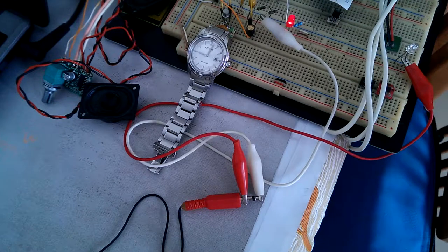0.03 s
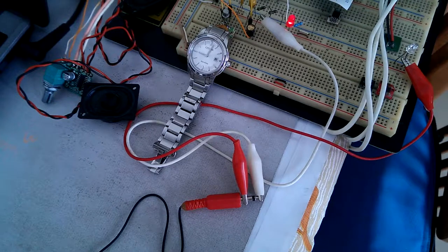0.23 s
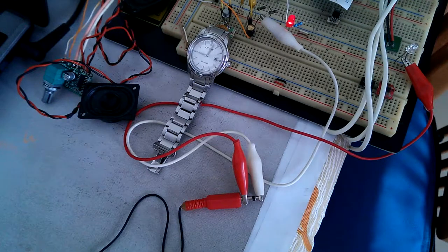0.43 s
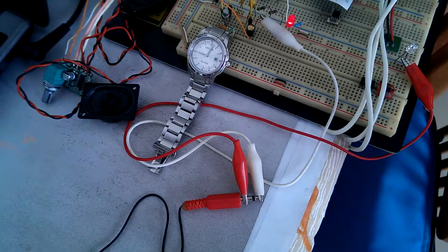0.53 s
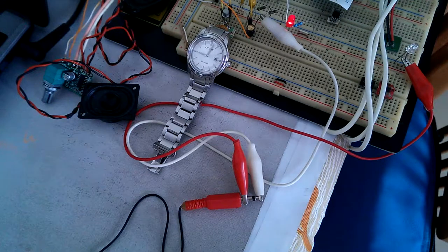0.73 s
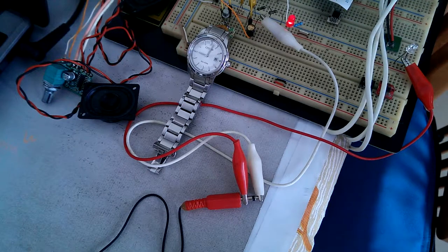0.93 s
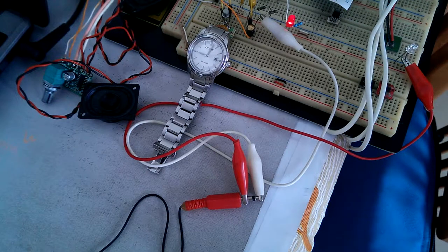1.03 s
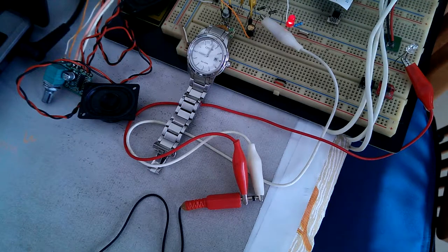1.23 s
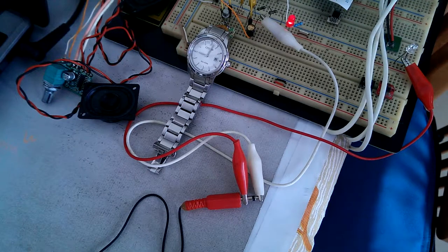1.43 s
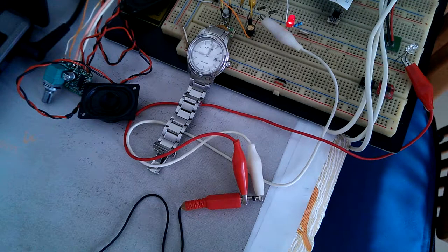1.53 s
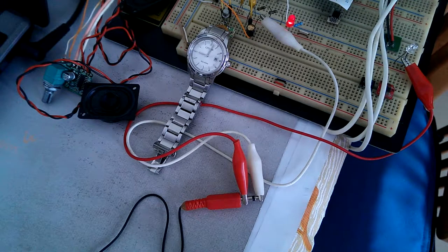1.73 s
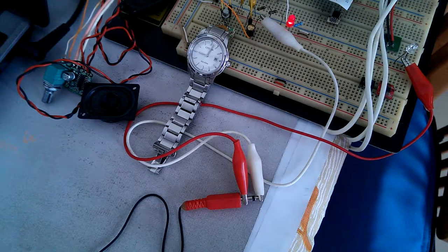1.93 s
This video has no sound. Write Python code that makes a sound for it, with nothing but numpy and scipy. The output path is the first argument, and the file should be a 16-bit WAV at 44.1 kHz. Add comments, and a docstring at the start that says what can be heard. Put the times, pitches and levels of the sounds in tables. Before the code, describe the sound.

Two crisp electronic ticks come from a wristwatch wired to a small amplifier, a second apart and dry, with no room sound. Behind them run a faint hiss and rumble, which fade after a tiny pop at the end.

```python
"""A quartz wristwatch ticking

The watch ticks twice, picked up electrically by a small amplifier. Each tick is a chopped burst of
current that drives its tiny motor, then thin sensing pulses while the rotor (a magnet) swings into
place. Faint hiss and low rumble lie underneath and drop away with a small pop near the end."""
import sys
import numpy as np
from scipy import signal
from scipy.fft import rfft, irfft
from scipy.io import wavfile

SR = 44100
rng = np.random.default_rng(int(sys.argv[2]) if len(sys.argv) > 2 else 0)


def digitize_waveform(pressure):
    """Quantize a signal to 16-bit integers and store it at the path in sys.argv[1].

    Rows of a 2-D input are taken as channels; values are limited to [-1, 1].
    """
    field = np.atleast_2d(pressure).T
    bounded = np.clip(field, -1, 1)
    quanta = np.round(bounded * 32767).astype(np.int16)
    wavfile.write(sys.argv[1], SR, quanta)


N = 88200

CHOP_HZ = 2048  # pulses per second within a burst
SENSE_AFTER_MS = 4.15  # from the start of a tick to its first sensing pulse
OVERSAMPLE = 8  # the thin pulses are drawn on a time grid this many times finer
POP_S = 1.8792


def undb(db):
    """Turn decibels into a number to multiply by."""
    return 10 ** (np.asarray(db) / 20)


def level(t, rows):
    """A loudness curve that glides from one row of (seconds, dB) to the next."""
    return undb(np.interp(t, *np.array(rows).T))


def noise(gain):
    """Noise shaped by a gain for each frequency, then scaled to an average (rms) level of 1."""
    x = irfft(rfft(rng.standard_normal(N)) * gain, N)
    return x / np.std(x)


def hiss(t, hz):
    """The amplifier's own faint hiss, which dips a little after each tick."""
    # Each row: frequency in Hz, relative strength there in dB.
    hiss_tone = [(20, -8), (40, -11), (64, -14), (88, -3.5), (114, -6), (145, -1.5), (230, -3.5), (400, -6),
                 (656, -9), (12300, -14), (15500, -19)]
    # Each row: time in seconds, level in dB.
    hiss_levels = [(0, -66.5), (.21, -68), (.3, -68.5), (.5, -66.5), (1.15, -65.5), (1.3, -67.5),
                   (1.5, -66.5), (1.88, -68)]
    points_hz, db = np.array(hiss_tone).T
    tone = undb(np.interp(np.log(hz), np.log(points_hz), db))
    return level(t, hiss_levels) * noise(tone * (hz < 15800))


def rumble(t, hz):
    """A low band of noise that slowly swells twice."""
    # Each row: time in seconds, level in dB.
    rumble_levels = [(0, -88), (.7, -82), (.83, -71.5), (1.1, -71), (1.35, -78), (1.65, -77.5),
                     (1.8, -71.5), (1.88, -83.5)]
    centre_hz, width_hz = 330, 220
    return level(t, rumble_levels) * noise(1 / (1 + (2 * (hz - centre_hz) / width_hz) ** 2))


def amplifier(x, coupling_hz, bass_hz, q):
    """Capacitors make each voltage step sag and swing back (more with higher q); treble is softened."""
    w = 2 * np.pi * bass_hz
    swinging = signal.lfilter(*signal.bilinear([1, 0, 0], [1, w / q, w * w], SR), x)
    sagging = signal.lfilter(*signal.butter(1, coupling_hz, "high", fs=SR), swinging)
    return signal.lfilter(*signal.butter(1, 9000, "low", fs=SR), sagging)


def pulses(t, width_ms, count):
    """Current switched on and off: a burst of slightly uneven square pulses, starting at t = 0."""
    edge = lambda u: np.clip(u * SR * OVERSAMPLE, 0, 1)
    uneven = 1 + rng.standard_normal((count, 2)) * [.07, .025]  # height and width vary
    burst = 0
    for k, (height, stretch) in enumerate(uneven):
        since_on = t - k / CHOP_HZ
        burst += height * (edge(since_on) - edge(since_on - stretch * width_ms / 1000))
    return burst


def coil(t, sense_count, closing_height):
    """One motor step: the drive burst, thin sensing pulses, the rotor's answer, two last thin pairs."""
    sense_t = t - SENSE_AFTER_MS / 1000
    answer_t = sense_t - sense_count / CHOP_HZ
    check_t = answer_t - .00122
    closing_t = check_t - 2 / CHOP_HZ
    return (pulses(t, width_ms=.326, count=7)
            + .23 * pulses(sense_t, width_ms=.035, count=sense_count)
            - 1.04 * pulses(answer_t, width_ms=.115, count=2)
            - .17 * pulses(check_t, width_ms=.035, count=2)
            + closing_height * pulses(closing_t, width_ms=.035, count=2))


def rotor(t, hz, sense_count):
    """The magnet swings about its new position, making a short, low wobble in the voltage."""
    answer_s = SENSE_AFTER_MS / 1000 + sense_count / CHOP_HZ
    peak_after_s, spread_s = .00185, .00225
    from_peak = t - answer_s - peak_after_s
    return np.exp(-(from_peak / spread_s) ** 2) * np.sin(2 * np.pi * hz * from_peak)


def watch(t):
    """Two motor steps a second apart, with the current flowing the opposite way the second time."""
    # Each row: start in seconds, current direction (1 or -1), level in dB, number of sensing pulses,
    # height of the closing pulses (the drive is 1), wobble pitch in Hz, wobble in dB relative to the tick.
    ticks = [(0.21774, 1, 1, 4, 1.15, 318, -13.6), (1.21753, -1, -0.66, 5, 0.7, 287, -14.4)]
    fine_t = np.arange(N * OVERSAMPLE) / (SR * OVERSAMPLE)
    voltage, wobble = np.zeros(len(fine_t)), np.zeros(N)
    for start, direction, db, sense_count, closing_height, wobble_hz, wobble_db in ticks:
        gain = direction * undb(db)
        near = np.abs(fine_t - start) < .05
        voltage[near] += gain * coil(fine_t[near] - start, sense_count, closing_height)
        wobble += gain * undb(wobble_db) * rotor(t - start, wobble_hz, sense_count)
    voltage = signal.resample_poly(voltage, 1, OVERSAMPLE)
    return amplifier(voltage, coupling_hz=1050, bass_hz=315, q=2.1) + wobble


def pop(t):
    """A small voltage step, heard as a soft pop."""
    step = undb(-33.5) * (t >= POP_S)
    return amplifier(step, coupling_hz=600, bass_hz=150, q=.85)


def scene():
    """The watch over hiss and rumble, which both fall away after the pop; one channel."""
    t = np.arange(N) / SR
    hz = np.maximum(np.arange(N // 2 + 1) * SR / N, 1)
    drop_db, fade_db_per_s = -3, -55
    fade = undb((t > POP_S) * (drop_db + fade_db_per_s * (t - POP_S)))
    return (watch(t) + pop(t) + fade * (hiss(t, hz) + rumble(t, hz)))[None]


def record(dry):
    """Round off the tallest peaks and cut the treble above 16100 Hz."""
    rounded = dry / (1 + dry ** 8) ** (1 / 8)
    return signal.sosfiltfilt(signal.butter(16, 16100, fs=SR, output="sos"), rounded)


dry = scene()
out = record(dry)
digitize_waveform(out)
```